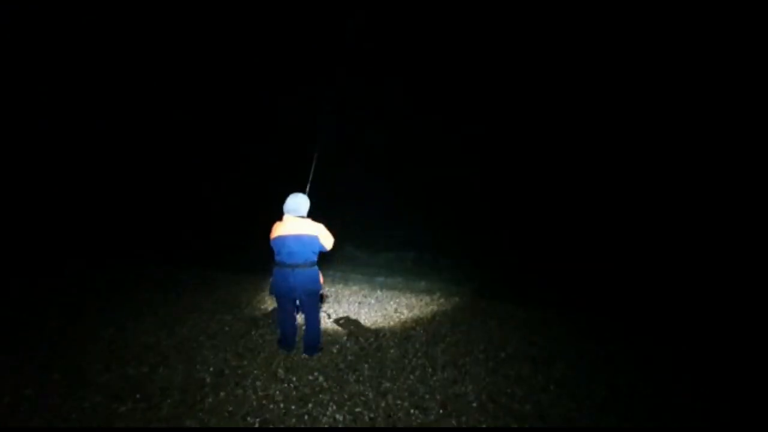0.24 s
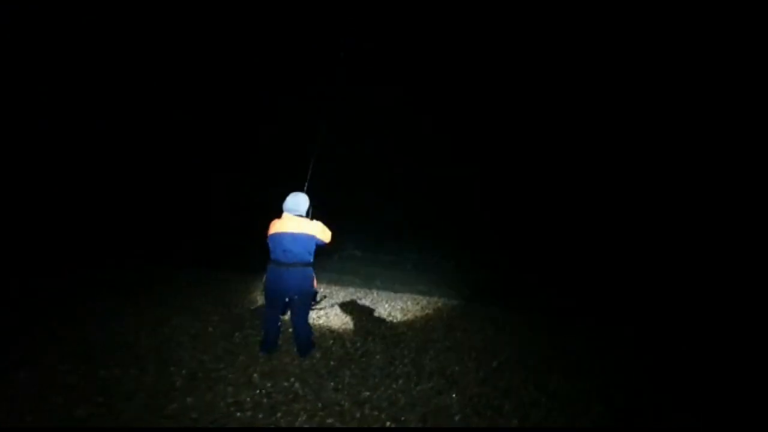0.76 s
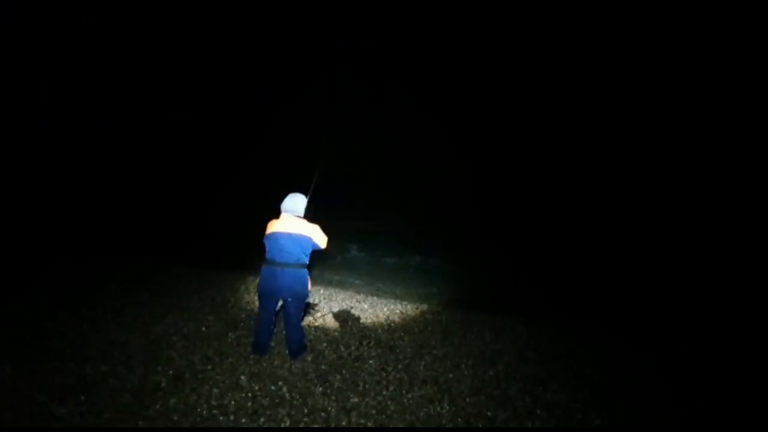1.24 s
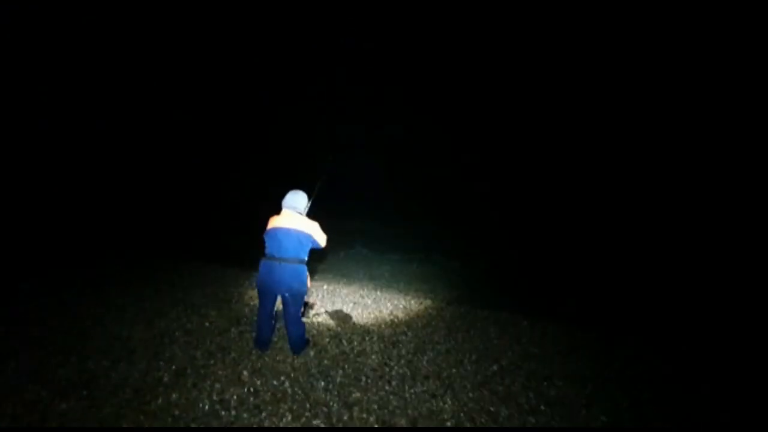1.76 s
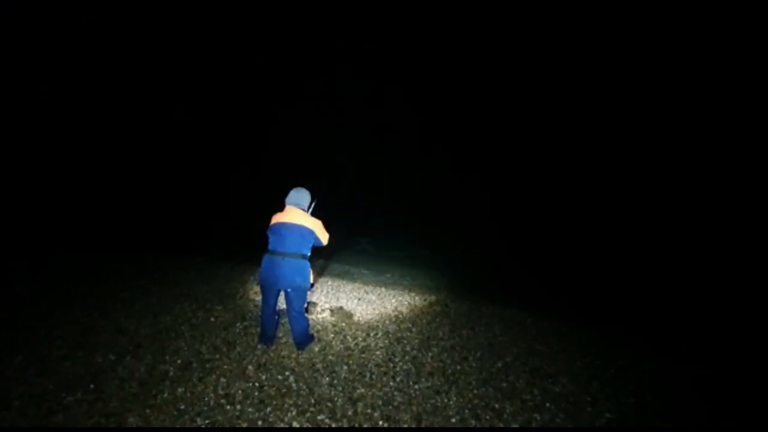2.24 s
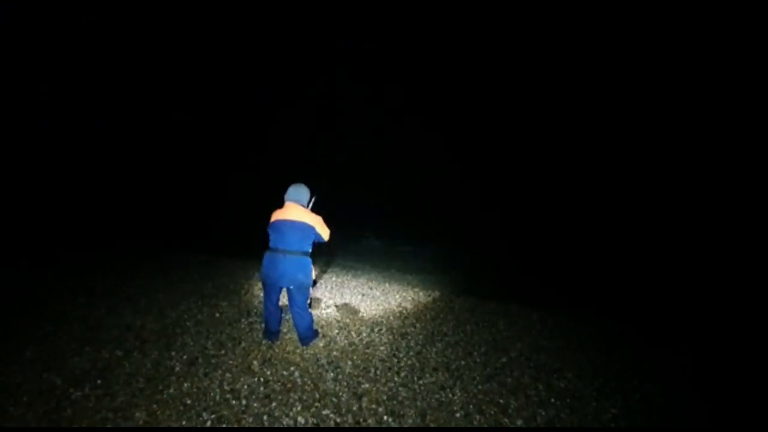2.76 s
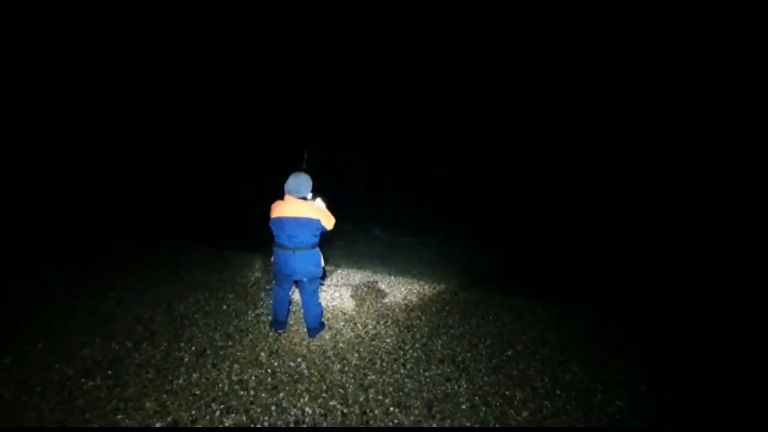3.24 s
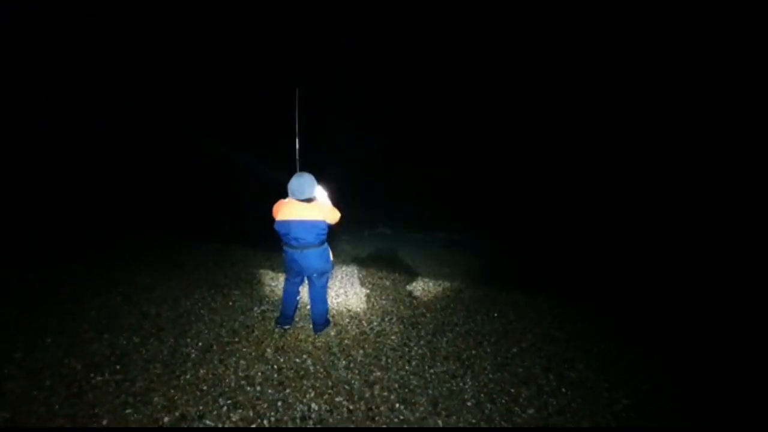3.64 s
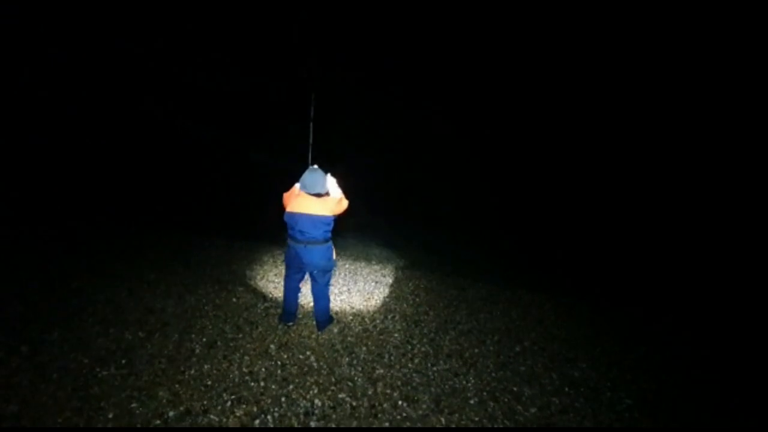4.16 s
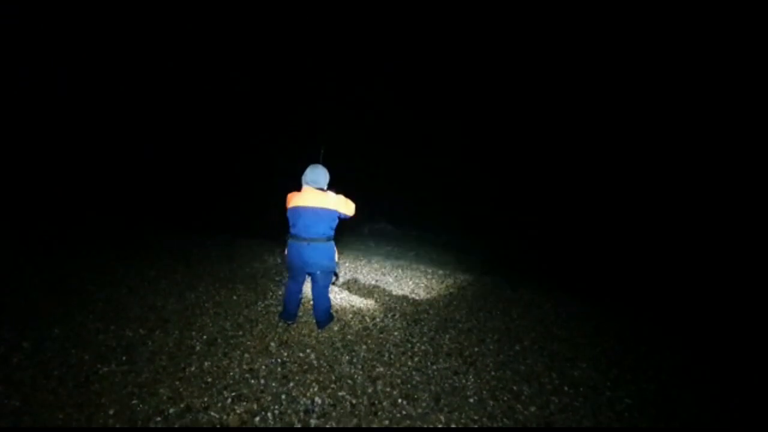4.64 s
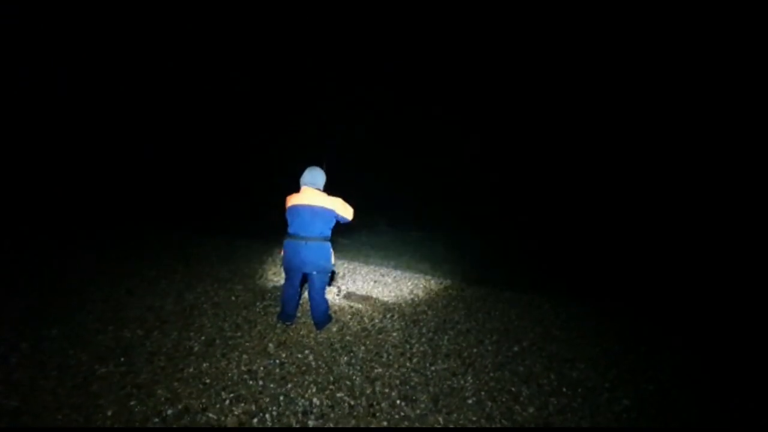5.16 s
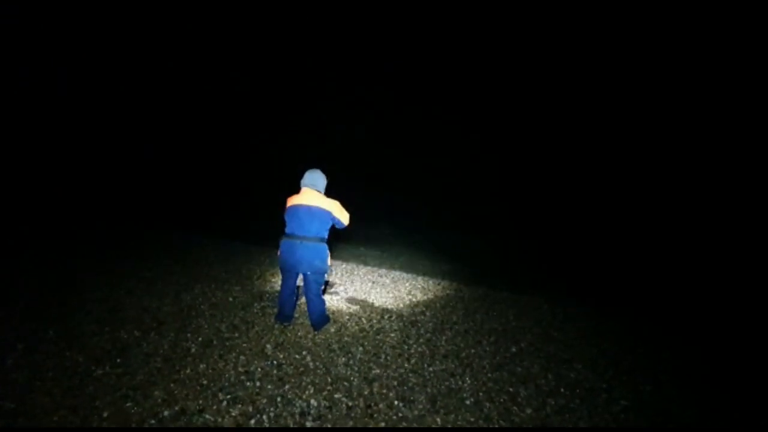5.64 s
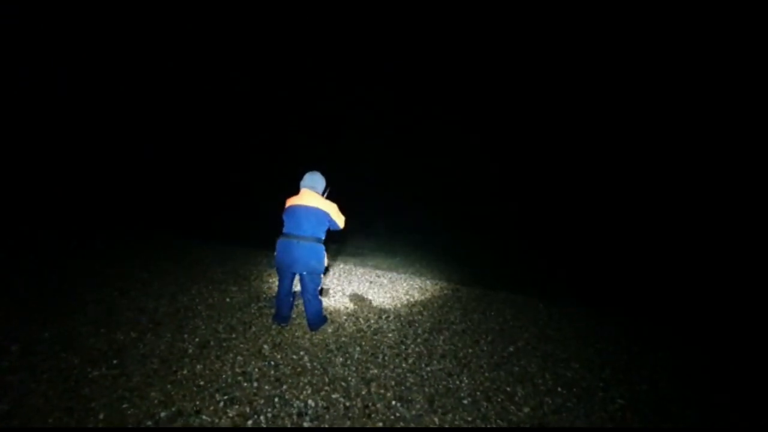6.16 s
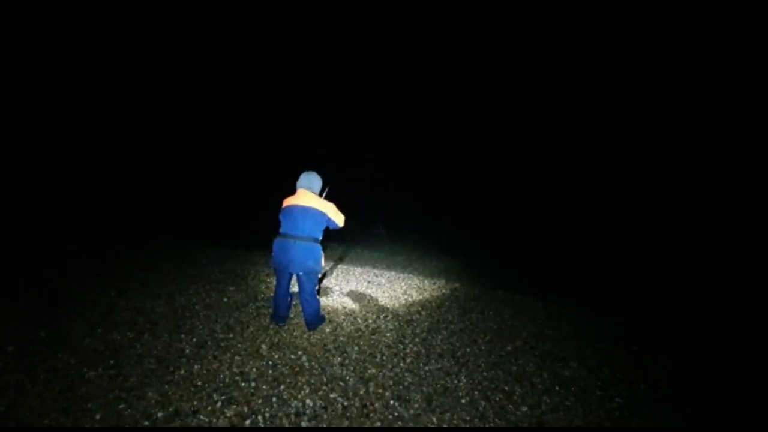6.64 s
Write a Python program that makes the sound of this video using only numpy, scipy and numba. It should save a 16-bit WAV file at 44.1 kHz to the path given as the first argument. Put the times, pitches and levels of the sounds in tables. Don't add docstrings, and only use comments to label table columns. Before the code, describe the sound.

Boots crunch on shingle, stones settling in clicks, as wind thumps the microphone and night surf washes in and drags back over pebbles.

```python
import sys
import numpy as np
from scipy import signal
from scipy.fft import rfft, irfft
from scipy.io import wavfile
from scipy.ndimage import uniform_filter1d
from numba import njit

SR = 44100
rng = np.random.default_rng(int(sys.argv[2]) if len(sys.argv) > 2 else 0)


def store_wav(level_fs):
    pcm = np.round(np.clip(np.atleast_2d(level_fs), -1, 1) * 32767)
    wavfile.write(sys.argv[1], SR, pcm.T.astype(np.int16))


def convert_level_to_amplitude(level_db):
    exponent = np.asarray(level_db, float) / 20
    return 10 ** exponent


N = 304290
TIME = np.arange(N) / SR
RIGHT_LAG, LEFT_LAG = 19, -10


def columns(table):
    s, *rest = np.transpose(table)
    return [np.interp(TIME, s, c) for c in rest]


def by_pitch(hz, centres, values):
    return np.interp(np.log(hz), np.log(centres), values)


def unit(x):
    return x / np.sqrt(np.mean(x ** 2))


def highpass(x, order, hz):
    return signal.sosfilt(signal.butter(order, hz, "high", fs=SR, output="sos"), x)


@njit
def bandpass(x, hz, width):
    y, band, low = np.empty(len(x)), 0., 0.
    g, k = np.tan(np.pi * hz / SR), width / hz
    for i in range(len(x)):
        v = (band + g * (x[i] - low)) / (1 + g * (g + k))
        band = 2 * v - band
        low += 2 * g * v
        y[i] = k * v
    return y


@njit
def rings(start, hz, t60, left, right, lag):
    margin = 32
    out = np.zeros((2, N + 8192))
    for k in range(len(start)):
        pole = np.exp(2j * np.pi * hz[k] / SR - np.log(1000) / (t60[k] * SR))
        z, i = 1 + 0j, int(start[k] * SR) + margin
        for n in range(min(int(t60[k] * SR), 8000)):
            out[0, i + n + int(lag[k])] += left[k] * z.imag
            out[1, i + n] += right[k] * z.imag
            z *= pole
    return out[:, margin:N + margin]


def chances(count):
    return rng.random((count, 3)).T


def walk(rate):
    k = int(SR / rate)
    held = np.repeat(rng.standard_normal(N // k + 1), k)
    return 1.4 * uniform_filter1d(uniform_filter1d(held, k), k)[:N]


def swell(start, hold, rise, fall):
    return np.minimum(0, rise * (TIME - start)) - fall * np.maximum(0, TIME - start - hold)


def knocks(s, size, pan_db, low_hz, high_hz, t60, db, spread):
    pitch, ring, place = chances(len(s))
    hz = low_hz * (min(high_hz, 16000) / low_hz) ** pitch
    lag = np.clip(spread * (2 * place - 1), -30, 30)
    size = size * convert_level_to_amplitude(db)
    out = rings(s, hz, t60 * (.5 + ring), size * convert_level_to_amplitude(pan_db / 2), size * convert_level_to_amplitude(-pan_db / 2), lag)
    return highpass(out, 4, .8 * low_hz)


# start in seconds, hold in seconds, level in dB,
# grit over that level in dB.
TREAD = [
    (0.0, 0.16, -24, -2),
    (0.307, 0.028, -42, 11.5),
    (0.395, 0.029, -33.5, 7),
    (0.476, 0.0071, -39.5, -6),
    (0.537, 0.14, -34, -20),
    (0.719, 0.18, -30, -6.5),
    (1.11, 0.14, -45, -2.5),
    (1.632, 0.056, -44.5, -7),
]
# thud, crunch and grit in dB.
TRICKLE_DB = (-7.5, -9, -8)


def tread():
    press, lift, settle = 450, 431, 24
    thud_db = -7
    power = 1e-12
    for s, hold, db, grit_db in TREAD:
        top = db + np.array([[thud_db], [0], [grit_db]])
        trickle = np.array(TRICKLE_DB)[:, None] + swell(s + hold, 0, lift, settle)
        power = power + convert_level_to_amplitude(2 * top) * (convert_level_to_amplitude(2 * swell(s, hold, press, lift)) + convert_level_to_amplitude(2 * trickle))
    return 10 * np.log10(power) - 200 * np.maximum(0, TIME - 2)


# lowest pitch in Hz, highest pitch in Hz,
# t60 in seconds, level in dB, spread of delay between the ports in samples.
STONE_BANDS = [(194, 1106, 0.0038, 1, 2.5), (2446, 5150, 0.0039, -1.5, 5.3),
               (5150, 14900, 0.0013, 5.5, 25.0)]


def boots():
    levels = tread()
    when, size, pan = chances(count=30000)
    when = when * 2.2
    size = (1 - size) ** -np.interp(when, [.9, 1.1], [.27, .42])
    size = np.minimum(size, 7)
    out, slip = np.zeros((2, N)), convert_level_to_amplitude(1.5 * walk(40.06))
    for band, level_db in zip(STONE_BANDS, levels):
        grains = knocks(when, size, 6 * (pan - .5), *band)
        t60 = band[2]
        out += grains * convert_level_to_amplitude(level_db) * slip / np.sqrt(t60 * 900)
    return out


# time in seconds, crunch in dB, grit in dB.
CLICKS = [(0.2963, -21.5, -21), (0.3062, -28.5, -22), (0.3296, -25, -27), (0.3577, -22, -21),
          (0.4141, -21, -12), (0.4835, -32, -20), (0.4949, -32, -18), (0.701, -36, -24), (0.7162, -33, -24),
          (0.9536, -24, -24), (0.9932, -17, -14.5), (1.0702, -31, -21), (1.0763, -25.5, -25),
          (1.0951, -38, -15.5), (1.0978, -26, -18), (1.1224, -42, -22), (1.2077, -33, -33),
          (1.2253, -22, -25.5), (1.2656, -29, -18), (1.2928, -26, -24), (1.3419, -26, -27),
          (1.3746, -25.5, -27), (1.4334, -15.5, -21.5), (1.4819, -24, -31), (1.4882, -47, -24.5),
          (1.528, -27.5, -19.5), (1.6179, -24, -25.5), (1.6782, -43, -27), (1.8364, -27, -18),
          (1.9356, -29.5, -25)]
# time in seconds, crunch in dB, grit in dB.
ROLLED = [(3.026, -45, -56), (3.5519, -43, -42), (3.8433, -54, -43), (4.1354, -53, -43), (4.3794, -45, -52),
          (4.5436, -37, -48), (4.638, -37, -41), (4.8471, -38, -44), (5.178, -33, -45), (6.1037, -42, -51),
          (6.3453, -52, -51)]
# time in seconds, pitch in Hz, t60 in seconds, level in dB.
HOLLOW = [
    (1.529, 1070, 0.045, -24.5),
]


def stray_stones():
    when, crunch, grit = chances(count=44)
    db = -25 - 3 * when - 12 * np.array([crunch, grit])
    db = db + [[-9], [0]]
    return np.transpose([1.0 + 0.62 * when, *db])


def single_stones():
    rows = np.vstack([CLICKS, ROLLED, stray_stones()])
    pan_db = 9 + 10 * (chances(len(rows))[0] - .5)
    s, crunch_db, grit_db, pan_db = np.repeat(np.c_[rows, pan_db], 24, axis=0).T
    late = rng.exponential(size=len(s))
    s, fade = s + .0007 * late - .0004, convert_level_to_amplitude(-5.0 * late)
    crunch = knocks(s, fade * convert_level_to_amplitude(crunch_db), 0.28 * (pan_db - 8.0), 2740, 5200, 0.0055, -8.5, spread=7.2)
    grit = knocks(s, fade * convert_level_to_amplitude(grit_db), pan_db - 10.0, 6270, 15000, 0.004, .5, spread=7)
    s, hz, t60, db = np.transpose(HOLLOW)
    return crunch + grit + rings(s, hz, t60, convert_level_to_amplitude(db - 6.0), convert_level_to_amplitude(db), 0 * s - 10)


def pebbles(level_db):
    when, size, pan = chances(count=6000)
    clatter = knocks(when * N / SR, (1 - size) ** -.25, 8 * (pan - .5), 5000, 15000, .002, 0, spread=20)
    return unit(clatter) * convert_level_to_amplitude(level_db)


# time in seconds, swell of heavy water in dB, foam on the stones in dB.
SURF = [(0, -45, -60), (1.3, -57.5, -49), (1.7, -48, -47), (2.0, -46, -49), (2.4, -50, -56),
        (3.0, -44, -58), (3.4, -45, -61), (3.8, -50, -55.5), (4.0, -45.5, -52), (4.4, -46, -48.5),
        (4.8, -44, -43.5), (5.3, -45.5, -43.5), (5.6, -46, -47), (5.8, -45.5, -44), (6.2, -49, -56.5),
        (6.4, -50, -52), (6.7, -46, -56.5), (6.9, -53, -59.5)]
# centre in Hz, dB per Hz over the level, share of foam against swell
SURF_ZONES = [(150, -25, 0.47, 0), (330, -26.5, 0.03, 0.22), (1300, -27, 0.43, 0.86),
              (3540, -41.5, 0.42, 1), (9500, -43, 0.96, 0.14)]
# start in seconds, rise in seconds, dB over the surf.
CRESTS = [
    (2.15, 0.22, 4.5),
    (4.78, 0.16, 5.5),
    (6.45, 0.46, 13),
]
# time in seconds, share on the left from 0 to 1.
BREAKING = [(1.0, 1), (1.5, 0.06), (3.7, 0.07), (4.1, 0.07), (4.8, 0.32), (5.2, 0.67), (6.25, 0.62),
            (6.45, 0.17), (6.9, 0.02)]
# Hz, left port in dB, right port in dB.
FROM_RIGHT = [(515, 0.5, 0.5), (960, -5, -5), (1560, -6, -5), (1920, 0, 0.5), (2400, 1, -6), (10500, -7, 5),
              (13600, 10, -1)]
# Hz, left port in dB, right port in dB.
FROM_LEFT = [(300, 1, 0), (550, -5, 1.5), (1280, 3, 2), (1740, -2.5, -6), (2300, 0.5, -11),
             (3500, -1.5, 3.5), (5000, -8.5, 2), (10000, 4, 0)]


def surf():
    spread_hz = 1340
    echo_lag, echo_shares = 62, [.15, .5]
    heavy, foam = columns(SURF)
    crest_fall = 8
    crest = sum(np.maximum(0, db + swell(s + rise, 0, db / rise, crest_fall)) for s, rise, db in CRESTS)
    share, = np.clip(columns(BREAKING), 0, 1)
    centres, offsets, foamy, spill = np.transpose(SURF_ZONES)
    levels = offsets[:, None] + heavy + np.outer(foamy, foam - heavy) + np.outer(spill, crest)
    right_hz, *right_db = np.transpose(FROM_RIGHT)
    left_hz, *left_db = np.transpose(FROM_LEFT)
    out, surge = np.zeros((2, N)), walk(3.337)
    for hz in 120 * 2 ** np.arange(0, 7.1, 1 / 3):
        width = hz / 4
        weights = [by_pitch(hz, centres, row) for row in np.eye(len(centres))]
        db = weights @ levels + 10 * np.log10(width)
        right, left, *apart = (unit(bandpass(noise, hz, width)) for noise in rng.standard_normal((4, N)))
        echo = np.outer(echo_shares, np.roll(left, echo_lag)) / (1 + (hz / 2500) ** 2)
        left = (left + echo) * np.sqrt(share)
        right = right * np.sqrt(1 - share)
        right_shade = [by_pitch(hz, right_hz, ear) for ear in right_db]
        left_shade = [by_pitch(hz, left_hz, ear) for ear in left_db]
        db = db + np.outer(right_shade, 1 - share) + np.outer(left_shade, share)
        alike = min(1.037 / (1 + (hz / spread_hz) ** 3) + 0.14, 1)
        pair = np.array([np.roll(right, RIGHT_LAG) + np.roll(left[0], LEFT_LAG), right + left[1]])
        mixed = np.sqrt(alike) * pair + np.sqrt(1 - alike) * np.array(apart)
        out += convert_level_to_amplitude(db + surge + 1.33 * walk(9)) * mixed
    return out + pebbles(levels[-1] + 39.5)


# time in seconds, peak in dB, pitch in Hz.
SLUMPS = [(2.27, -37, 260), (2.36, -33.5, 241), (2.432, -39.5, 314), (2.533, -36, 273), (2.799, -53, 280),
          (3.081, -41, 230), (4.424, -37, 241), (4.541, -34, 192), (4.629, -33, 310), (4.72, -35, 180),
          (4.796, -31, 300), (4.941, -29, 200), (5.072, -33, 303), (5.205, -36, 305), (5.297, -36.5, 324),
          (5.424, -36.5, 242), (6.38, -39, 200), (6.543, -48, 347)]


def slumps():
    s, db, hz = np.repeat(np.array(SLUMPS), 9, axis=0).T
    late, pitch, ring = chances(len(s))
    share = np.clip(np.interp(s, *np.transpose(BREAKING)), 0, 1)
    lag = RIGHT_LAG + share * (LEFT_LAG - RIGHT_LAG)
    size = convert_level_to_amplitude(db - 6.5)
    return rings(s + 0.083 * late, hz * (0.683 + .65 * pitch), 0.051 + .05 * ring, size, size, lag)


def backwash():
    start_s, full_s, rise = 6.42, 6.8, 14
    hz = 1990.0
    grains = rng.standard_normal(N) * convert_level_to_amplitude(2.8 * walk(65))
    rattle = bandpass(bandpass(grains, hz, 330.0), hz, 600.)
    db = -46.5 + swell(full_s, 9, rise, 0) + swell(start_s, 9, 500, 0) + .8 * walk(10)
    rattle = unit(rattle) * convert_level_to_amplitude(db)
    return np.array([convert_level_to_amplitude(-4.0) * np.roll(rattle, RIGHT_LAG), rattle])


# time in seconds, level in dB.
BREEZE = [(0, -52), (1.2, -61), (1.6, -50), (2.15, -50), (2.4, -57), (3.7, -58), (4.1, -54), (5.1, -51.5),
          (5.9, -69), (6.4, -60), (6.9, -59)]
# time in seconds, hold in seconds, level in dB,
# left minus right in dB.
GUSTS = [(0.172, .005, -43, 2), (0.263, 0.017, -47, -18), (0.426, 0.0045, -41, -3), (0.51, 0.026, -41, -25),
         (0.76, 0.038, -48, 8), (0.874, 0.024, -47, 7), (1.035, 0.0082, -40.5, 102), (1.133, .005, -44, 18),
         (1.231, 0.01, -34, 24), (1.319, 0.059, -29.5, 31), (1.418, 0.0017, -30, 21),
         (1.488, 0.078, -35.5, 22), (1.682, 0.021, -23, 32), (1.79, 0.06, -22.5, 40.5),
         (1.967, 0.011, -23, 27), (2.051, 0.0042, -26.5, 30), (2.138, 0.015, -25, 30),
         (2.634, 0.032, -34, -27), (2.762, 0.012, -36.5, -23), (2.865, .005, -45, -18), (3.13, .03, -45, 8),
         (3.416, 0.049, -54, 8), (4.963, 0.13, -50, -14), (5.38, 0.0031, -41, -31),
         (5.504, 0.0057, -37, -28), (5.556, .005, -37.5, -30), (5.636, 0.018, -44, -25),
         (5.76, 0.093, -48, -17), (5.986, 0.03, -42, -21), (6.113, .03, -43.5, -30)]


def gusts(side):
    rise, fall = 378, 326
    power = convert_level_to_amplitude(2 * columns(BREEZE)[0]) / 2
    for s, hold, db, pan_db in GUSTS:
        eddy = convert_level_to_amplitude(2 * (db + swell(s, hold, rise, fall)))
        power = power + eddy / (1 + convert_level_to_amplitude(-2 * side * pan_db))
    return np.sqrt(power)


def wind():
    ports = []
    for side in (1, -1):
        flutter = unit(bandpass(bandpass(rng.standard_normal(N), 72.5, 43.0), 53.6, 33.3))
        strength = np.sqrt(np.abs(uniform_filter1d(flutter ** 2, size=1500)))
        flutter = unit(flutter / (0.13 + strength))
        rush = unit(bandpass(bandpass(rng.standard_normal(N), 116.0, 200.), 140.0, 220.))
        rush = convert_level_to_amplitude(-43.5 + 3.7 * walk(30)) * rush
        ports.append((flutter + rush) * gusts(side) * convert_level_to_amplitude(5.5 + 2.3 * walk(25)))
    return np.array(ports)


def scene():
    air = boots() + single_stones() + surf() + slumps() + backwash()
    return highpass(air, 3, 150) + highpass(wind(), 2, 48)


def port(x, colour):
    hz, db = np.transpose(colour)
    grid = np.maximum(np.arange(513) * SR / 1024, 1)
    cepstrum = irfft(by_pitch(grid, hz, db) * np.log(10) / 20)
    cepstrum[1:512] *= 2
    cepstrum[513:] = 0
    return signal.fftconvolve(x, irfft(np.exp(rfft(cepstrum))))[:N]


def low_pass(x):
    return signal.sosfilt(signal.butter(12, 16470, fs=SR, output="sos"), x)


# frequency in Hz, gain in dB.
LEFT_PORT = [(100, -0.5), (2000, 0.5), (4500, 1.5), (7200, -5), (8000, -1), (10500, 0), (13300, 1),
             (14300, 0.5), (15000, -13.5), (15500, -30), (17000, -48)]
# frequency in Hz, gain in dB.
RIGHT_PORT = [(300, 0.5), (750, -3.5), (1900, 3.5), (2400, 0.5), (3900, 5.5), (4400, 8), (4850, 10.5),
              (5150, 5), (5900, -4.5), (7900, -22), (8800, -13.5), (10000, -4.5), (13000, -6), (14500, -36)]


def record(dry):
    ports = np.array([port(dry[0], LEFT_PORT), port(dry[1], RIGHT_PORT)])
    return low_pass(ports)


dry = scene()
out = record(dry)
store_wav(out)
```